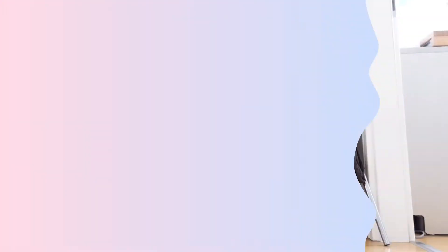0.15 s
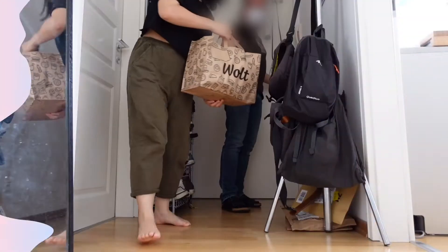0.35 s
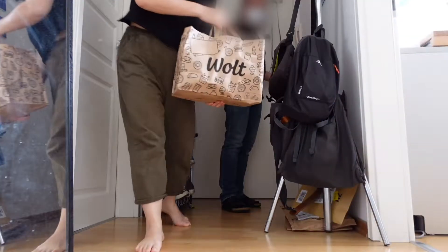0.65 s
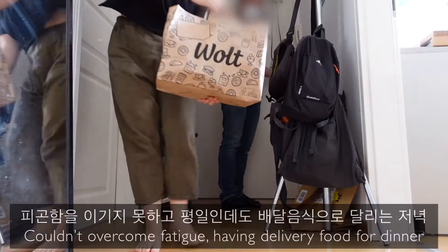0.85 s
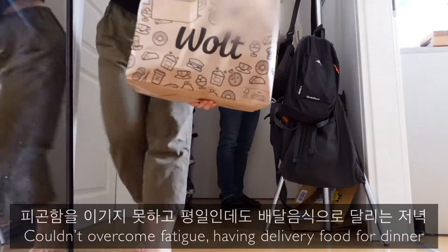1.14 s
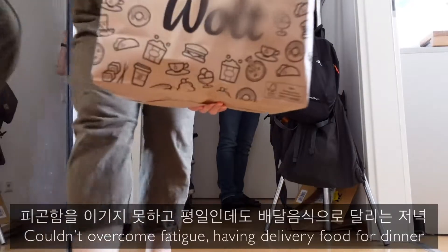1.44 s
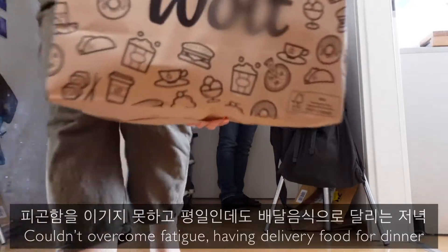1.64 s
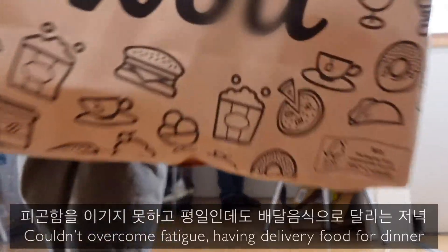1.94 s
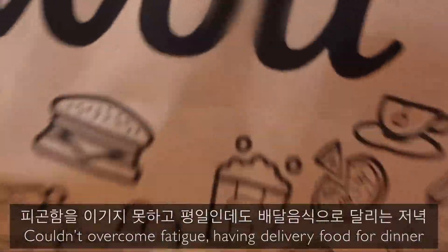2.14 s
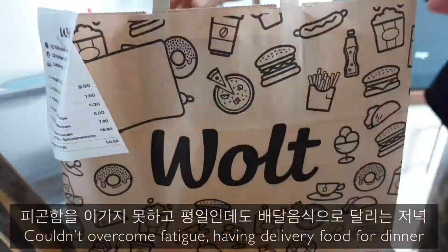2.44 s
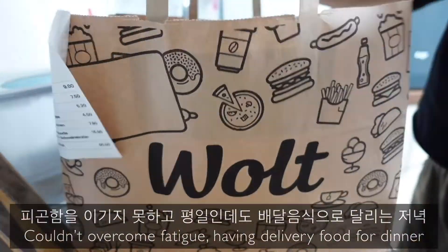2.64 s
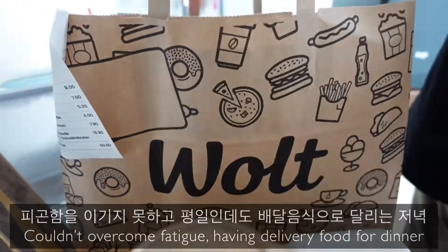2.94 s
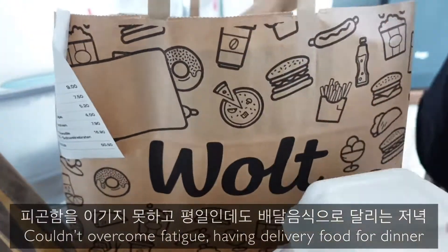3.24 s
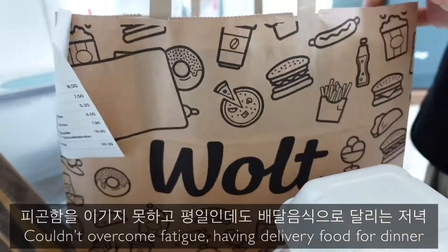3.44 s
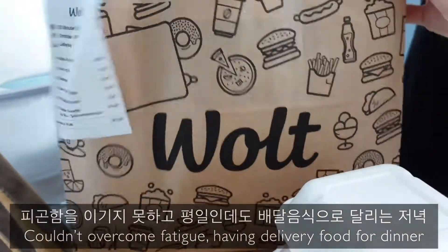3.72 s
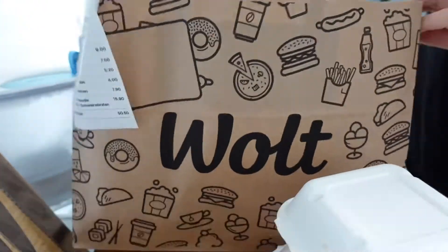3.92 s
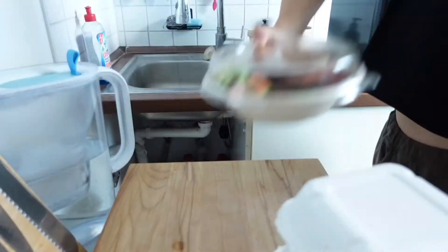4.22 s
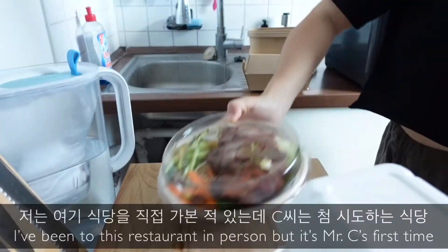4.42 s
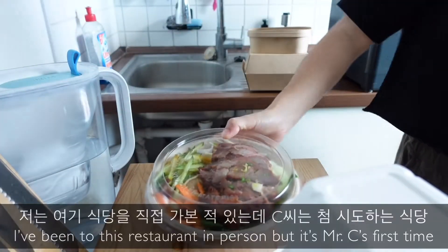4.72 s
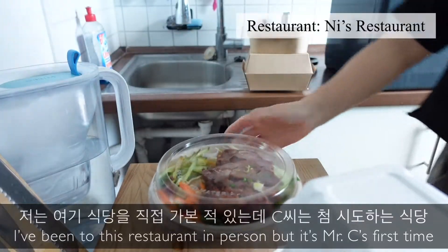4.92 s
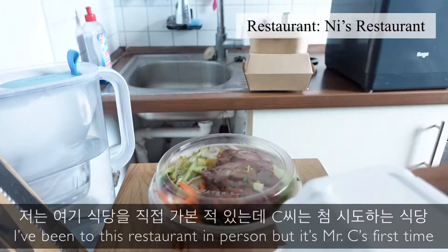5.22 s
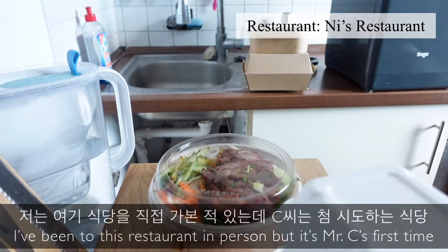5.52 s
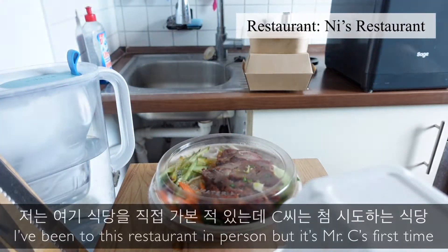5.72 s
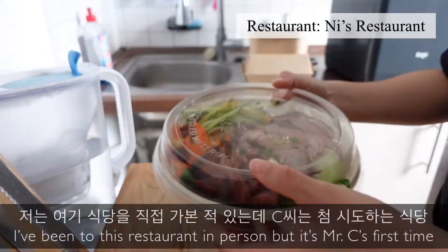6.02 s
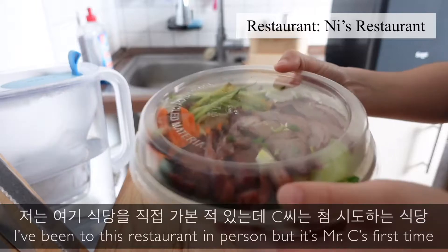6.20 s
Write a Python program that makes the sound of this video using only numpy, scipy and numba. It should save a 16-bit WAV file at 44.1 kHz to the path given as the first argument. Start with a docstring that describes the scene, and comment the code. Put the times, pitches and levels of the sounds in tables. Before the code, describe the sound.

A small, hard, quiet room with a very faint hum. A brief crisp paper rustle opens the scene, then a soft low footfall and floorboard rumble at about 0.3 s and a sharp snap of stiff paper at 0.5. Sparse crackles follow, with a clear one near 1.0 and small ones at 1.6 and 1.8, as the bag comes closer. A hard knock and crack lands at 2.3. From 2.5 to 4.15 the bag is crumpled close to the microphone: dense, dry, irregular bursts with loud snaps around 2.8, 3.4 and 3.65, a boxy thud at 3.0, and tails chopped by cuts. It then drops to near silence. At 4.5 a container lands softly; light crinkles and low bumps follow until 4.9. Duller, hollower rustles come at 5.4, 5.65 and 6.0 with soft thuds, then fade to quiet.

```python
"""Paper bag in a hard kitchen

A stiff paper bag is carried, opened and emptied close to the microphone in a small hard kitchen.
Dense swarms of buckling creases make the rustle: grainy noise through the bag's panels, hollow and edge.
Single creases snap as short noisy rings; feet, boxes and bowls thud as low decaying modes.
Under it lie a faint room hum, floor rumble and a wavering hollow tone; jump cuts chop off ringing paper."""
import sys
import numpy as np
from scipy import signal
from scipy.fft import rfft, irfft
from scipy.io import wavfile
from numba import njit

SR = 44100
rng = np.random.default_rng(int(sys.argv[2]) if len(sys.argv) > 2 else 0)


def dump(signal):
    """Clip the signal to [-1, 1] and save it as 16-bit WAV at the path in sys.argv[1]."""
    limited = np.clip(np.atleast_2d(signal).T, -1, 1)
    pcm = np.round(limited * 32767).astype(np.int16)
    wavfile.write(sys.argv[1], SR, pcm)


def invert_db(level):
    """Linear amplitude ratio for a level in decibels (20 dB per decade), elementwise."""
    return 10 ** (np.asarray(level, dtype=float) / 20)


N = 280476  # samples
TIME_S = np.arange(N) / SR

# colour of the room tone: [pitch_hz, relative_level_db per Hz]
HUM_COLOUR = [(88, -21.5), (150, 10), (267, 14), (364, 4), (409, 7.5), (15000, -20)]
# loudness of the room tone: [start_s, level_db]
HUM_LEVEL_CURVE = [(0, -67), (.9, -73.5), (2.3, -70.5), (2.45, -78), (4.15, -67.5), (4.3, -109),
                   (6.36, -74.5)]
# floorboards under moving feet: [start_s, level_db]
FLOOR_RUMBLE = [(0, -90), (.29, -82), (.32, -55), (.6, -54.5), (.9, -83), (1.5, -76.5), (1.7, -70),
                (2.3, -70), (2.45, -81), (4.2, -89), (6.36, -89)]
# a faint hollow tone off to one side that wavers in and out: [start_s, level_db]
HOLLOW_TONE_CURVE = [(1.6, -89), (1.72, -69), (1.9, -92), (2.2, -71), (2.41, -69), (2.43, -100), (4.2, -96),
                     (4.33, -65.5), (4.55, -83), (4.75, -95)]
HOLLOW_TONE_HZ = 627
# feet, boxes and bowls landing; the 628 Hz row at 2.385 s is a ring at the hollow tone's pitch: [start_s,
# level_db, ring_hz, t60_s, swell_ms]
LANDINGS = [(0.305, -30.5, 98, 0.18, 14), (0.061, -45.5, 209, 0.22, 5.7), (0.66, -46, 295.4, 0.27, 14),
            (2.014, -35, 367, 0.016, 2.7), (2.306, -23, 556, 0.026, 1.75), (3.773, -38, 580, 0.074, 2.4),
            (2.385, -42, 628, 0.2, 5.5), (2.992, -32.5, 279.3, 0.32, 2.9), (2.991, -20, 930, 0.041, 1.1),
            (4.49, -30.5, 435, 0.029, 1.4), (4.493, -34.5, 281, 0.26, 12), (4.769, -41, 446, 0.085, 5.2),
            (4.868, -38.5, 423, 0.18, 4.5), (4.881, -37, 281, 0.21, 20), (4.885, -34.5, 125, 0.39, 59),
            (4.918, -39, 182, 0.045, 2.1), (5.41, -44.5, 142, 0.35, 14), (5.64, -33.5, 190, 0.27, 13),
            (5.859, -45.5, 137.6, 0.46, 37)]
# single creases: [start_s, peak_db, ring_hz, decay_ms, crack_db re ring noise]
CREASES = [(0.085, -36, 2220, 1.8, 0), (0.311, -33, 1560, 4.1, -2), (0.5202, -13, 2580, 1.4, 5),
           (0.639, -34, 2160, 8.6, -3), (0.976, -24, 2110, 3.3, 2.5), (1.151, -44.5, 1940, 3.7, -6),
           (1.17, -40.5, 2800, 3.2, -4), (1.227, -45, 1830, 7.6, -10), (1.59, -43, 2780, 2.5, -7.5),
           (1.735, -35.5, 2820, 4.7, -29), (1.834, -22, 2650, 5.1, -10), (2.059, -39, 2720, 3.7, -8),
           (2.136, -44, 640, 3.9, -5), (2.308, -14, 2030, 1.6, 12), (2.475, -32.5, 2320, 0.39, -4),
           (2.506, -35, 2550, 2, -14), (2.622, -27, 2960, 5.3, -8), (2.666, -27, 1400, 2.9, 0),
           (2.759, -14.5, 2210, 5, 4.5), (2.778, -11, 2090, 6.8, 1), (2.945, -31, 8540, 2.6, -17),
           (2.99, -22.5, 970, 11.7, 0), (3.113, -28.5, 570, 4.3, -1), (3.168, -31, 595, 1, -9),
           (3.179, -37.5, 880, 1.9, -3), (3.324, -24, 3230, 1.2, -6.5), (3.326, -14, 2770, 4.4, -1),
           (3.411, -19.5, 3000, 4.4, -9), (3.418, -12.5, 3030, 4.1, 16), (3.602, -11.5, 1550, 2.5, -2),
           (3.66, -28, 2700, 5.2, -3), (3.671, -8.5, 1933, 3.7, 6), (3.676, -14.5, 2980, 3.1, 1),
           (3.952, -20.5, 3120, 3.6, 6), (3.982, -18.5, 4000, 6.9, 11.5), (4.021, -19, 1040, 3.7, -1),
           (4.49, -39, 1970, 2.6, -13), (4.693, -44, 1860, 3.5, -20), (4.771, -35.5, 2220, 14, -2.5),
           (4.84, -39, 2380, 15, -15), (4.866, -32, 2340, 14, -22), (4.871, -26.5, 2445, 5.2, -9)]
# where the action sits and how its cavity and edges sound:
# [start_s, left_minus_right_db, hollow_hz of bag or box, edge_rolloff_hz, side_db re mid]
PLACEMENT = [(0, 0, 298.6, 7710, -16), (.4, -0.5, 315, 7290, -29.5), (1.2, 0.5, 351, 6500, -18),
             (1.7, 0, 678, 5630, -17.5), (2.5, 0.5, 454, 5160, -17), (4.15, -0.6, 500, 6230, -19.5),
             (4.25, -2, 495, 6000, -9), (4.95, 0, 415, 5100, -15.5), (5.05, -0.5, 757, 3940, -9),
             (5.98, -1.5, 720, 3740, -10.5), (6.36, -1, 603, 3740, -16)]
# moments of jump cuts, where thuds and rustle bursts are chopped off: [cut_s]
JUMP_CUTS = [2.411, 2.68, 2.833, 3.134, 3.184, 3.241, 3.448, 3.75, 3.785, 6.032]
# character of four stretches (hallway, bag close by, table, counter behind it):
# [start_s, rise_ms, fade_db per s, late_tail_db re level, late_fade_db per s, grain 0-1, dip 0-1 near 390 Hz]
STRETCHES = [(0, 5, 192, -20.5, 82, 0.7, 0), (2.3, 0.19, 256.5, -14, 85, 0.55, 0.28),
             (4.15, 1.8, 191, -11.5, 79, 0.4, 0), (5.0, 2.4, 175, -12.5, 87, 0.45, 0.78)]
# each new grip reshapes the bag: [start_s, main_panel_hz, second_panel_hz, ring_db re sheet]
HAND_GRIPS = [(0, 2670, 4440, -30.5), (0.3, 4170, 2055, -4.5), (0.518, 2990, 5540, -8.5),
              (0.638, 2130, 4190, 1.5), (0.728, 3160, 4640, 3.5), (0.973, 1600, 3200, 2),
              (1.59, 2790, 1965, 20.5), (1.735, 2600, 1640, -4), (1.833, 2440, 2000, 9),
              (2.055, 2560, 3180, 8.5), (2.305, 2030, 1480, 4), (2.486, 2695, 1520, -20),
              (2.747, 2086, 2710, -36), (2.835, 2860, 3890, 27), (2.979, 940, 1446, -7),
              (3.093, 970, 1740, -4.5), (3.132, 2480, 1740, 1.5), (3.184, 6420, 4500, -12),
              (3.277, 2550, 1625, -5), (3.451, 1255, 4300, -11.5), (3.592, 1440, 2460, -1),
              (3.771, 1050, 3820, 3.5), (3.812, 1180, 2016, -7), (3.893, 5230, 3590, -6.5),
              (3.942, 1370, 3120, 0), (4.02, 1760, 2800, 0.5), (4.16, 2180, 4100, -3.5),
              (4.49, 2250, 3600, -2.5), (4.69, 2090, 1660, 20), (4.746, 2350, 2830, 11),
              (4.82, 2300, 1910, 17.5), (5.197, 2560, 1330, -1), (5.33, 2910, 4500, -17),
              (5.4, 1820, 4980, -11.5), (5.637, 1900, 970, -4), (5.845, 1160, 1830, -35.5),
              (6.002, 2160, 3130, -27), (6.035, 2190, 3285, 6.5)]
LESSER_HOLD_S = .055  # a lesser panel keeps its shape this long
# faint stirring of paper and clothes under the bursts: [start_s, level_db, boom_db re level, crisp_db re level]
STIRRING = [(0, -71.5, -16, -7), (.9, -72.5, -4, -9.5), (1.5, -81, -9, -2), (1.75, -71, -18, -8.5),
            (2.3, -73.5, 3, -2.5), (2.42, -78.5, -19, 2), (3.26, -67, -6, -6.5), (3.8, -69, -12, -2),
            (4.45, -76, 3.5, -7.5), (5.15, -75.5, 4, -0.5), (6.36, -75, -10, -9)]
# bursts of crumpling: [start_s, build_s, hold_s, level_db, boom_db re level, crisp_db re level]
CRUMPLES = [(0, 0, 0, -36.5, -18.5, 1), (0.076, 0.0063, 0.0058, -34.5, -13, -18),
            (0.296, 0.0071, 0.057, -43, -11.5, -1), (0.39, 0.00018, 0.14, -51.5, -11, -4.5),
            (0.453, 0.014, 0.15, -45.5, -24, -8.5), (0.515, 0.0031, 0.001, -27.5, -19.5, -8),
            (0.635, 0.00038, 0.021, -43, -9.5, -16.5), (0.725, 0, 0, -48.5, -20, -32),
            (0.975, 0.00045, 0.0052, -40, -25, -6), (1.127, 0.011, 0.084, -60.5, -11, -6.5),
            (1.192, 0.05, 0.028, -66, -6, -14), (1.589, 0, 0.0044, -62, -10, -16),
            (1.718, 0.017, 0, -56, -3.5, -32), (1.787, 0.022, 0.074, -72, -13, 10),
            (1.829, 0, 0.025, -44.5, -17.5, -23), (2.047, 0.0058, 0.023, -57, -7, -8),
            (2.302, 0.0044, 0.035, -43.5, -7.5, -1), (2.485, 0.00029, 0.059, -55.5, -8.5, -11),
            (2.53, 0.1, 0, -35, -6, -7), (2.642, 0.0086, 0.012, -44, -8, 0),
            (2.711, 0.0056, 0.057, -57.5, -2.5, -1), (2.743, 0.0059, 0.08, -42, -6, -12),
            (2.772, 0.0011, 0.0019, -28.5, -7.5, -26.5), (2.832, 0.00069, 0, -59.5, -13, 6),
            (2.87, 0.052, 0.016, -51, -39, 0.5), (2.976, 0.0029, 0.074, -45.5, -7, -5),
            (3.05, 0.065, 0.11, -38.5, -1, -0.5), (3.129, 0, 0.15, -52, -4.5, -2.5),
            (3.185, 0, 0.041, -56.5, -10, 1.5), (3.278, 0, 0.019, -42, -0.5, -13),
            (3.322, 0, 0, -34.5, -1.5, -14), (3.344, 0.005, 0.048, -38, -22, -4.5),
            (3.414, 0.0092, 0, -34, 1, -7.5), (3.442, 0, 0.063, -55.5, 3, -0.5),
            (3.495, 0.0037, 0.061, -70, 14.5, 2), (3.595, 0.0098, 0.015, -30.5, -11, -11.5),
            (3.651, 0.013, 0.0099, -28, -8.5, -15.5), (3.697, 0.0015, 0.026, -33, -14, -15.5),
            (3.772, 0.0058, 0, -39.5, -13, -16), (3.809, 0.0065, 0.042, -53.5, 2.5, -2),
            (3.886, 0.012, 0.092, -46, -4.5, -10.5), (3.939, 0.0033, 0.018, -36.5, -8, -7.5),
            (4.019, 0, 0, -35, -7.5, -11.5), (4.055, 0.013, 0.031, -50.5, -14, 0),
            (4.105, 0.012, 0.018, -51.5, -10, 5), (4.158, 0, 0, -42, -11.5, -31),
            (4.499, 0, 0.023, -70.5, 12.5, -23.5), (4.501, 0.0054, 0.12, -61.5, -19, -6),
            (4.678, 0.012, 0.073, -56, -13.5, -38), (4.75, 0.00049, 0.054, -51.5, -14, -25.5),
            (4.802, 0.047, 0.031, -46, -23, -35), (4.866, 0.00029, 0.011, -49.5, -3, -30),
            (5.183, 0.0056, 0.061, -59, -4, -9.5), (5.322, 0.0068, 0.022, -40, -18, -11.5),
            (5.397, 0.014, 0.022, -28.5, -7, -8), (5.565, 0.018, 0.044, -59.5, -8, 0.5),
            (5.632, 0.0074, 0.057, -36.5, -3, -14), (5.78, 0.011, 0.086, -58.5, 4, 0.5),
            (5.839, 0.0022, 0.022, -39, -7, -25), (5.915, 0, 0.051, -42.5, -8, -14),
            (5.989, 0.018, 0.07, -33.5, -18, -11), (6.033, 0, 0.059, -59, -11.5, -12),
            (6.085, 0.012, 0.1, -63.5, -13, -15), (6.201, 0.048, 0.012, -61.5, -26, -27)]
BUILD_DB = 17  # a build-up climbs this far
BOOM_FADE, CRISP_FADE = 0.83, 1.27  # fade speed of bass and treble, as a ratio to the body


def unit(x):
    """Scale to rms 1."""
    return x / np.sqrt(np.mean(x ** 2))


def curve(rows):
    """Columns of a table, joined by straight lines in time."""
    start_s, *columns = np.transpose(rows)
    return [np.interp(TIME_S, start_s, column) for column in columns]


def stretch(s):
    """Columns of the stretch that holds time s."""
    row = np.searchsorted(np.transpose(STRETCHES)[0], s, side="right") - 1
    return np.array(STRETCHES)[row].T


def next_cut(s):
    """Sample number of the first jump cut after time s, ignoring one within 6.25 ms."""
    return int(min([cut * SR for cut in JUMP_CUTS if cut > s + 1 / 160] + [N]))


def band(x, lo_hz, hi_hz, order):
    """Butterworth band-pass."""
    edges_hz = [lo_hz, min(hi_hz, .45 * SR)]
    return signal.sosfilt(signal.butter(order, edges_hz, "band", fs=SR, output="sos"), x)


@njit
def svf(x, hz, q):
    """Moving resonance; noise keeps its level wherever the centre goes."""
    y, b, l = np.empty(len(x)), 0., 0.
    for i in range(len(x)):
        g = np.tan(np.pi * hz[i] / SR)
        v = (b + g * (x[i] - l)) / (1 + g * (g + 1 / q))
        b, l = 2 * v - b, l + 2 * g * v
        y[i] = v / np.sqrt(hz[i])
    return y


def spread(mid, side, side_db):
    """Left and right differ mostly in the middle range; the action leans a little to one side."""
    lean = invert_db(curve(PLACEMENT)[0] / 2)
    side = invert_db(side_db) * band(side, 250, 9500, order=1)
    return np.array([(mid + side) * lean, (mid - side) / lean])


def hum():
    """Room tone and hiss of fixed colour, rising and sinking with a level curve."""
    hz, db = np.transpose(HUM_COLOUR)
    log_hz = np.log(np.fft.rfftfreq(N, 1 / SR) + 1)
    gain = invert_db(np.interp(log_hz, np.log(hz), db))
    mid, side = irfft(rfft(rng.standard_normal((2, N))) * gain, N)
    return invert_db(curve(HUM_LEVEL_CURVE)[0]) * unit(spread(mid, side, -3))


def rumble():
    """Floorboards under feet: low band noise, nearly the same on both sides."""
    floor, sway = band(rng.standard_normal((2, N)), 67, 160, order=2)
    stereo = floor + invert_db(-26) * np.array([sway, -sway])
    return invert_db(curve(FLOOR_RUMBLE)[0]) * unit(stereo)


def hollow_tone():
    """Narrow noisy ring, stronger on the left."""
    noise = rng.standard_normal((2, N))
    ring, other = band(noise, HOLLOW_TONE_HZ / 1.06, HOLLOW_TONE_HZ * 1.06, order=2)
    stereo = np.array([ring + 0.74 * other, .7 * ring - 0.55 * other])
    return invert_db(curve(HOLLOW_TONE_CURVE)[0]) * unit(stereo)


def thuds():
    """Each landing swells into one low mode that sags a little, rough at first; a jump cut chops it off."""
    out = np.zeros((2, N))
    noises = rng.standard_normal((len(LANDINGS), SR // 2))
    for (s, level_db, ring_hz, t60_s, swell_ms), noise in zip(LANDINGS, noises):
        i = int(s * SR)
        t = np.arange(min(SR // 2, next_cut(s) - i)) / SR
        rough = unit(band(noise, ring_hz / 1.43, ring_hz * 1.52, order=2))[:len(t)]
        sagging_time = t + 0.0015 * (1 - np.exp(-t / 0.015))  # pitch starts high and settles
        mode = np.sin(2 * np.pi * ring_hz * sagging_time)
        tone = mode + rough * np.exp(-t / .06) * np.array([[.8], [.68]])  # left, right roughness
        envelope = (1 - np.exp(-1000 * t / swell_ms)) ** 2 * np.exp(-np.log(1000) * t / t60_s)
        out[:, i:i + len(t)] += invert_db(level_db) * envelope * tone
    return out


def snaps():
    """The freed panel rings roughly, with a broad crack on top; long snaps also build up slowly."""
    out, t = np.zeros((2, N)), np.arange(2048) / SR
    noises = rng.standard_normal((len(CREASES), 3, 2048))
    for (s, peak_db, ring_hz, decay_ms, crack_db), noise in zip(CREASES, noises):
        attack = 1 - np.exp(-1000 * t / (0.0056 * decay_ms ** 2))
        envelope = attack * np.exp(-1000 * t / max(decay_ms, .5))
        ring, side = (unit(band(n, ring_hz / 1.69, ring_hz * 1.27, order=2)) for n in noise[:2])
        tone = 1.26 * np.sin(2 * np.pi * ring_hz * t)
        crack = unit(band(noise[2], 1100, 5570, order=2)) * np.exp(-t / 0.006)
        pop = envelope * np.array([ring + tone + invert_db(crack_db) * crack, side])
        i = int(s * SR)
        out[:, i:i + 2048] += invert_db(peak_db) * pop / np.abs(pop[0]).max()
    return spread(*out, curve(PLACEMENT)[3] - 3)


def levels():
    """Body, boom and crisp dB: every burst builds up, holds and fades into the room until a cut."""
    body_db, boom_db, crisp_db = curve(STIRRING)
    power = invert_db([body_db, body_db + boom_db, body_db + crisp_db]) ** 2
    speed = np.array([[1], [BOOM_FADE], [CRISP_FADE]])
    for s, build_s, hold_s, level_db, boom_db, crisp_db in CRUMPLES:
        fade, late_db, late_fade = stretch(s)[2:5]
        i = int(max(s, 0) * SR)
        t = np.arange(min(next_cut(s) - i, SR)) / SR - build_s  # zero where the build-up ends
        after = speed * np.maximum(t - hold_s, 0)
        climb_db = BUILD_DB * np.minimum(t, 0) / max(build_s, 1 / SR)
        tail = invert_db(-fade * after) ** 2 + invert_db(late_db - late_fade * after) ** 2
        parts_db = level_db + np.array([[0], [boom_db], [crisp_db]]) + climb_db
        power[:, i:i + len(t)] += invert_db(parts_db) ** 2 * tail
    return 10 * np.log10(power)


@njit
def swell(target, rate):
    """Follows a level: rises at the given rate, falls at once."""
    y, e = np.empty(len(target)), target[0]
    for i in range(len(target)):
        e = min(target[i], e + rate[i] * (target[i] - e))
        y[i] = e
    return y


def swarm(per_s, scatter_db, smear_ms):
    """Loudness of many tiny bucklings, mostly small and a few larger, each fading away exponentially."""
    size_db = scatter_db * np.minimum(rng.exponential(size=N), 3)
    hits = (rng.random(N) < per_s / SR) * invert_db(size_db) ** 2
    power = signal.lfilter([1], [1, -np.exp(-1000 / (smear_ms * SR))], hits)
    return np.sqrt(power / power.mean())


def panels(octaves, count):
    """Two main panels per grip, lesser ones that keep refolding round them, and how strongly they ring."""
    s, main_hz, second_hz, ring_db = np.transpose(HAND_GRIPS)
    grip = np.maximum(np.searchsorted(s * SR, np.arange(N), side="right") - 1, 0)
    sheet_hz = np.clip(main_hz ** .7 * second_hz ** .3, 1400, 4200)
    pace = TIME_S / LESSER_HOLD_S + rng.random((count, 1))  # each panel refolds at its own moments
    folds = np.take_along_axis(rng.standard_normal((count, N // 100)), pace.astype(int), axis=1)
    lesser_hz = np.clip(sheet_hz[grip] * 2 ** (octaves * folds), 500, 9000)
    return sheet_hz[grip], main_hz[grip], second_hz[grip], lesser_hz, ring_db[grip]


def paper_body(noise, shape, grain, crackles):
    """The broad sheet, its refolding lesser panels and the two ringing main panels."""
    sheet_hz, main_hz, second_hz, lesser_hz, ring_db = shape
    sheet = unit(band(svf(grain * noise, sheet_hz, 0.34), 920, 6370, order=2))
    # every lesser panel buckles at its own moments, so each crackle has its own colour
    lesser = unit(sum(svf(own * noise, hz, 21.0) for hz, own in zip(lesser_hz, crackles)))
    main = svf(grain * noise, main_hz, 6.4)
    second = svf(grain * noise, second_hz, 4.9)
    ring = invert_db(ring_db) * unit(main + .5 * second)
    body = (sheet + 2.12 * stretch(TIME_S)[5] * lesser + ring) / np.sqrt(1 + invert_db(ring_db) ** 2)
    return unit(band(body, 330, 8000, order=1))


def bag_boom(noise, lesser_hz, grain):
    """Air in the bag or box resonates low, with faint modes at a fifth of the lesser panels' pitch."""
    hollow = svf(grain * noise, curve(PLACEMENT)[1], 0.52)
    modes = sum(svf(noise, hz / 5, 10.8) for hz in lesser_hz)
    boom = unit(band(hollow + 0.037 * modes, 99, 1100, order=2))
    dip = np.clip(stretch(TIME_S)[6], 0, 1)
    return boom - dip * band(boom, 276, 477, order=1)


def crisp_edge(noise, lesser_hz, grain, crackles):
    """The crisp edge is bright noise in which small folds ring high."""
    edge_hz = curve(PLACEMENT)[2]
    bright = svf(svf(grain ** 0.9 * noise, edge_hz, 0.25), edge_hz, 0.5) * np.sqrt(edge_hz)
    crisp = unit(band(bright, 3500, 12160, order=2))
    folds = 0
    for hz, own in zip(lesser_hz[1:], crackles):
        fold_hz = np.clip(2.6 * hz, 3500, 2.1 * edge_hz)
        folds = folds + svf(own * crisp, fold_hz, 22.0) * np.sqrt(hz)
    return unit(crisp + 0.37 * unit(folds))


def paper(boom_db, crisp_db, shape, grain, crackles):
    """Grainy noise through the sheet and its panels, the air inside the bag and the crisp edge."""
    noise = rng.standard_normal((3, N))
    lesser_hz = shape[3]
    body = paper_body(noise[0], shape, grain, crackles)
    boom = bag_boom(noise[1], lesser_hz, grain)
    crisp = crisp_edge(noise[2], lesser_hz, grain, crackles)
    return body + invert_db(boom_db) * boom + invert_db(crisp_db) * crisp


def rustle():
    """The swarm is grainy while hands work the paper and smoother while only the room rings on."""
    level_db, boom_db, crisp_db = levels()
    fall = -np.gradient(level_db) * SR  # dB per second
    graininess = np.clip(stretch(TIME_S)[5], 0, 1)
    smooth = 1 - graininess * np.clip(.5 - fall / 300, .1, .7)
    grain = np.sqrt(smooth + (1 - smooth) * swarm(per_s=320, scatter_db=1.5, smear_ms=0.37) ** 2)
    shape = panels(octaves=0.553, count=6)
    crackles = [np.sqrt(smooth ** 2 + (1 - smooth ** 2) * swarm(per_s=28, scatter_db=1.8, smear_ms=3) ** 2)
                for _ in shape[3]]
    mid, side = (paper(boom_db - level_db, crisp_db - level_db, shape, grain, crackles) for _ in range(2))
    rise_ms = np.maximum(stretch(TIME_S)[1], .1)
    loudness = swell(invert_db(level_db), 1000 / (rise_ms * SR))
    return loudness * spread(mid, side, curve(PLACEMENT)[3])


def scene():
    """Everything in the kitchen, from the background to the paper."""
    return hum() + rumble() + hollow_tone() + thuds() + snaps() + rustle()


def band_limit(x):
    """A steep low-pass at the top of the band."""
    return signal.sosfilt(signal.butter(12, 15700, fs=SR, output="sos"), x)


def record(dry):
    """A steep low-pass takes off the top above 15.7 kHz."""
    low_pass = signal.ellip(8, .2, 70, 15700, fs=SR, output="sos")
    mix = signal.sosfilt(low_pass, dry)
    return band_limit(mix)


dry = scene()
out = record(dry)
dump(out)
```